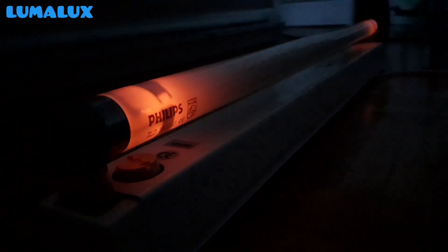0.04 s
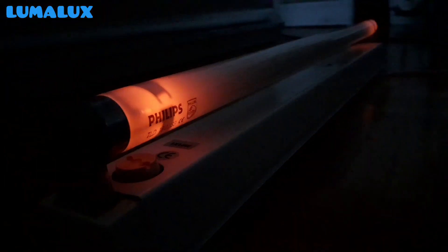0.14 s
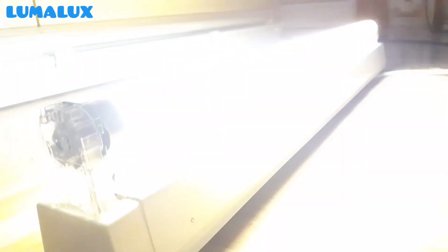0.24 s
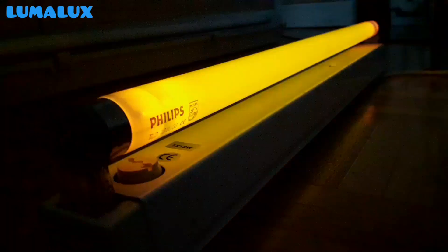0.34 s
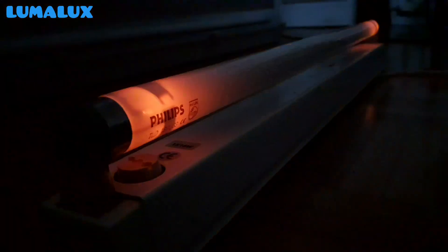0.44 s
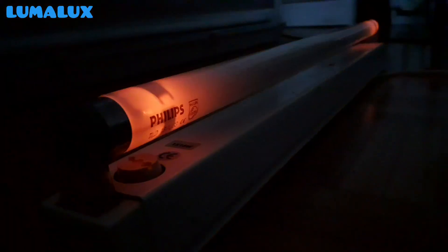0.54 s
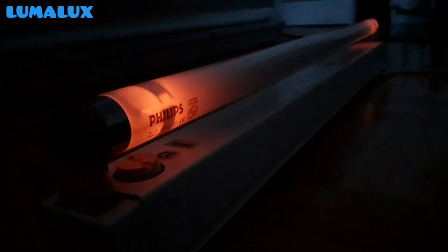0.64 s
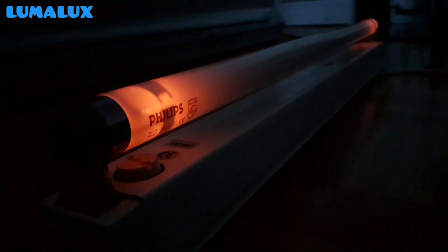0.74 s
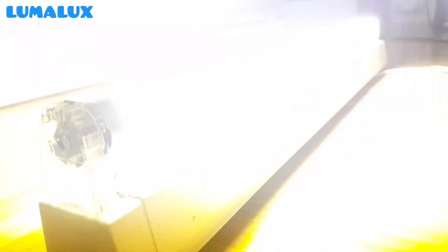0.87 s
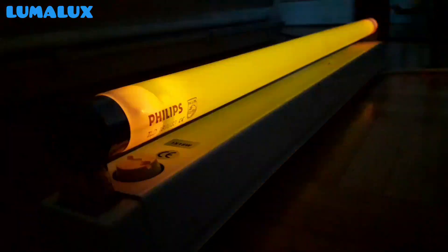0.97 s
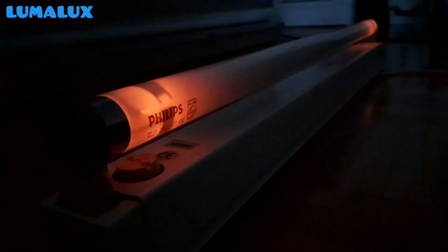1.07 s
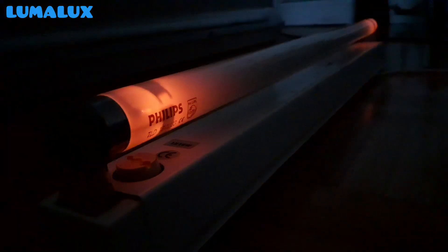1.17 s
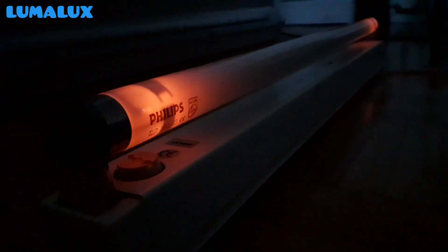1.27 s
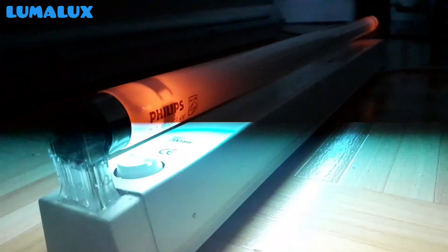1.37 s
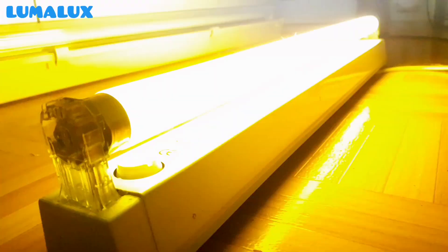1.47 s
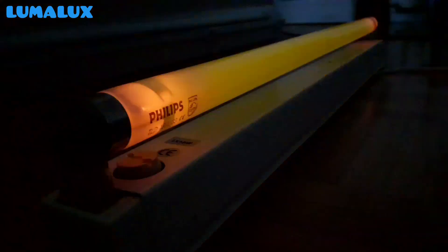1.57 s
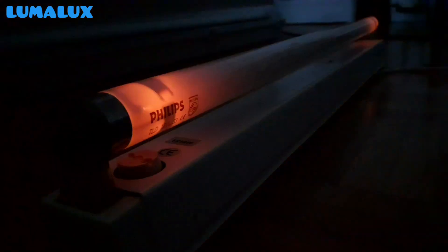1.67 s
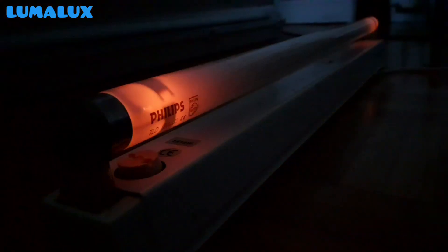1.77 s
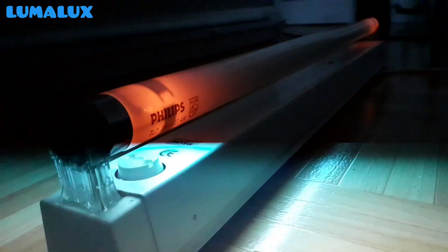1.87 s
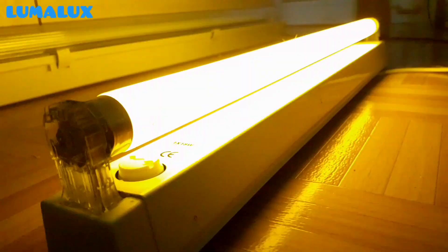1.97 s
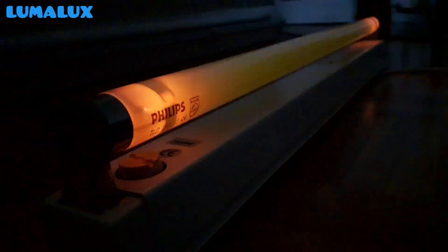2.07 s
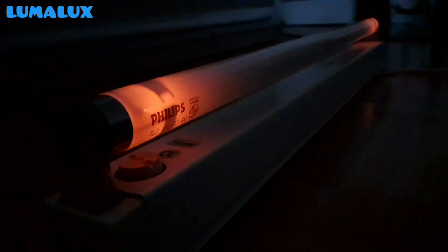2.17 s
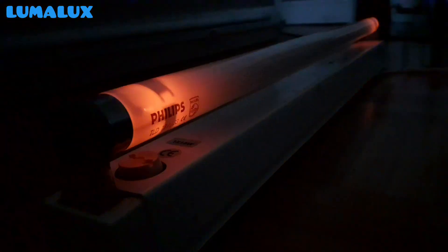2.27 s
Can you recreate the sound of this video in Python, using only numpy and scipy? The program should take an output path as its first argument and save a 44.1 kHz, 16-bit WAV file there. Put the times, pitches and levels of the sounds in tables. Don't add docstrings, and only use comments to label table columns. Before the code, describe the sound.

Metallic clacks of a fluorescent lamp starting burst four times over a steady low electrical hum

```python
import sys
import numpy as np
from scipy import signal
from scipy.fft import rfft, irfft, next_fast_len
from scipy.io import wavfile

SR = 44100
rng = np.random.default_rng(int(sys.argv[2]) if len(sys.argv) > 2 else 0)


def dump(signal):
    limited = np.clip(np.atleast_2d(signal).T, -1, 1)
    pcm = np.round(limited * 32767).astype(np.int16)
    wavfile.write(sys.argv[1], SR, pcm)


def level_to_linear(level):
    exponent = np.asarray(level, float) / 20
    return 10 ** exponent


N = 101430
T = np.arange(N) / SR
CUTOFF_HZ = 15800

# [t/s, plate level/dB, tray level/dB, crack level/dB, glass level/dB]
STRIKES = [(0.235, -35.5, -38.5, -51.5, -52), (0.244, -43, -47, -55, -68),
           (0.255, -25.5, -37.5, -38.5, -41), (0.274, -21.5, -42, -43, -42.5),
           (0.293, -32, -32, -39.5, -41), (0.876, -40.5, -39.5, -57, -58), (0.893, -33, -39, -44.5, -47),
           (0.914, -29.5, -37, -40.5, -47), (0.928, -71, -37, -71, -52), (1.435, -34.5, -36.5, -45.5, -49),
           (1.454, -33, -36.5, -44.5, -49.5), (1.475, -30.5, -60, -42, -47.5),
           (1.499, -47, -36, -65, -49.5), (1.935, -31.5, -35.5, -45.5, -51), (1.955, -35, -40.5, -49, -49),
           (1.975, -28, -33.5, -39.5, -42), (2.009, -66, -34.5, -61, -77)]
# [t/s, low plate level/dB, high plate level/dB, crack level/dB, bulb level/dB]
CONTACT_SNAPS = [
    (0.227, -42, -39, -54, -44.5),
    (0.325, -49, -50, -50.5, -54),
    (.867, -42, -41, -56.5, -50),
    (1.417, -58.5, -44.5, -60, -60),
    (1.917, -53.5, -46.5, -62, -65),
    (1.965, -80, -44.5, -60.5, -50),
]


def rms_one(x):
    return x / np.sqrt(np.mean(x ** 2) + 1e-20)


def at_hz(points, hz, column=1):
    points = np.array(points)
    return np.interp(np.log(hz), np.log(points[:, 0]), points[:, column])


def sides(left_db):
    return level_to_linear(np.array([[0.5], [-0.5]]) * left_db)


def cut(x, hz, kind, order=2):
    return signal.sosfilt(signal.butter(order, hz, kind, fs=SR, output="sos"), x)


def low_pass(x, hz):
    return signal.sosfilt(signal.ellip(12, 0.5, 85, hz, fs=SR, output="sos"), x)


def drift(rate_hz):
    hop = 40
    pole = np.exp(-2 * np.pi * rate_hz * hop / SR)
    noise = rng.standard_normal(N // hop + 2002)
    slow = signal.lfilter([1], [1, -2 * pole, pole ** 2], noise)[2000:]
    return np.interp(np.arange(N) / hop, np.arange(len(slow)), rms_one(slow))


def coloured(spectrum, low_hz, high_hz):
    # [f/Hz, coherence, left-right level/dB]
    diffuse = [(30, 0.09, -9), (125, 0.33, 10.5), (490, 0.079, -1), (1940, 0.043, 2.5), (3730, 0.022, 5.5),
               (10800, 0.0057, 0.5)]
    hz = np.maximum(np.fft.rfftfreq(N, 1 / SR), 1)
    mid, side = rfft(rng.standard_normal((2, N)))
    alike = np.sqrt(np.clip(at_hz(diffuse, hz), 0, 0.99))
    pair = np.sqrt(1 + alike) * mid + np.sqrt(1 - alike) * side * [[1], [-1]]
    band = 1 / (1 + (low_hz / hz) ** 12) / (1 + (hz / high_hz) ** 12)
    balance = sides(at_hz(diffuse, hz, column=2))
    return rms_one(irfft(pair * level_to_linear(at_hz(spectrum, hz)) * band * balance, N))


def clicks(s, gains):
    out = np.zeros(N, complex) + 1e-18
    out[(np.asarray(s) * SR).astype(int)] = gains
    return out


def body(modes, s, db, ear_rad=0.013):
    spread_db, spread_rad = 2.5, 0.72
    swell_s = 0.0012
    out = np.zeros((2, N))
    soft = np.exp(-1 / (swell_s * SR))
    for hz, mode_db, t60, left_db in modes:
        turn = np.exp(2j * np.pi * hz / SR)
        chance = rng.standard_normal((len(s), 2))
        gains = level_to_linear(db + mode_db + spread_db * chance[:, 0]) * np.exp(1j * spread_rad * chance[:, 1])
        decay = level_to_linear(-60 / (max(t60, 0.005) * SR))
        ringing = signal.lfilter([1], [1, -decay * turn], clicks(s, gains))
        ringing = signal.lfilter([1 - soft], [1, -soft * turn], ringing)
        ear_phase = np.exp(1j * rng.normal(ear_rad, 0.29) * np.array([[1], [-1]]))
        out += sides(left_db) * np.imag(ringing * ear_phase)
    return out


def crackle(spectrum, top_hz, s, db, t60, left_db):
    tail = signal.lfilter([1], [1, -level_to_linear(-60 / (t60 * SR))], clicks(s, level_to_linear(db)).real)
    flash_t60 = 0.0009
    flash = signal.lfilter([1], [1, -level_to_linear(-60 / (flash_t60 * SR))], clicks(s, level_to_linear(db - 13.5)).real)
    mid, side = rng.standard_normal((2, N)) * (tail + flash)
    hz = np.maximum(np.fft.rfftfreq(N, 1 / SR), 1)
    colour = level_to_linear(at_hz(spectrum, hz)) / (1 + (spectrum[0][0] / hz) ** 6) / (1 + (hz / top_hz) ** 12)
    colour /= np.sqrt(np.mean(colour ** 2))
    return irfft(rfft(mid + 0.97 * side * [[1], [-1]]) * colour, N) * sides(left_db)


def double_hit(s, db, hz, t60, again_s, again_db, left_db):
    pole = level_to_linear(-60 / (max(t60, 0.003) * SR)) * np.exp(2j * np.pi * hz / SR)
    force = clicks(s, level_to_linear(db)) + clicks(s + again_s, level_to_linear(db + again_db))
    ringing = signal.lfilter([np.e * (1 - abs(pole))], [1, -2 * pole, pole ** 2], force)
    return sides(left_db) * np.imag(ringing)


def microphone_hiss():
    # [f/Hz, spectral level/dB per Hz]
    hiss_spectrum = [(2300, 0.5), (3100, -2), (3900, 1), (5500, -6.5), (9000, -13), (10700, -3), (12000, 3),
                     (15700, 2.5)]
    return level_to_linear(-69) * low_pass(coloured(hiss_spectrum, 2300, 22000), CUTOFF_HZ + 50)


def room_air():
    # [f/Hz, spectral level/dB per Hz]
    air_spectrum = [(25, -18), (60, 0), (200, 2), (450, 3), (800, 0), (1050, -5.5), (1450, -12.5),
                    (1950, -5.5)]
    return level_to_linear(-64.5 + 1.0 * drift(0.57)) * coloured(air_spectrum, 33, 2180)


def thuds():
    # [t/s, level/dB, f/Hz]
    far_blows = [
        (0.128, -62, 160),
        (0.322, -64, 72),
        (1.486, -62, 100),
        (1.702, -65.5, 101),
        (2.018, -58, 69),
    ]
    t60 = 0.16
    return sum(body([(hz, 0.0, t60, 6.0)], [s], db) for s, db, hz in far_blows)


def room(x):
    t60, wall_cut_hz = 0.29, 37000
    size = next_fast_len(N + SR)
    w = 2 * np.pi * np.fft.rfftfreq(size)
    absorption = 1 / (1 + 1j * w * SR / (2 * np.pi * wall_cut_hz)) ** 0.033
    out = np.zeros((2, len(w)), complex)
    for k, lag in enumerate(rng.uniform(0.0072, 0.03, 16) * SR):
        loop = level_to_linear(-60 * lag / SR / t60) * absorption * np.exp(-1j * w * lag)
        out[k % 2] += loop / (1 - loop) * (-1) ** (k // 2)
    return irfft(out * rfft(x, size), size)[:, :N] / 2


def preheat_current():
    # [opens t/s, closes t/s]
    open_spells = [
        (0.23, 0.373),
        (0.87, 1.011),
        (1.42, 1.53),
        (1.92, 2.076),
    ]
    fade_s, swell_s, left_over_db = 0.077, 0.032, -21
    current = np.ones(N)
    for opens, closes in open_spells:
        fade = np.exp(-np.clip(T - opens, 0, closes - opens) / fade_s)
        back = np.exp(-np.clip(T - closes, 0, None) / swell_s)
        current *= 1 - (1 - level_to_linear(left_over_db)) * (1 - fade) * back
    return current


def ballast():
    # [multiple of the buzz, level/dB, left-right level/dB, phase/rad, right lag/rad]
    harmonics = [(2, -80, -5, -0.5, 0.12), (3, -60.5, 6, -4.5, 0.71), (4, -51.5, 4.5, -0.62, 0.012),
                 (4.5, -80, 21.5, 2.2, 0.067), (5, -65.5, 7, 1, 1.75), (6, -76.5, 11, 8, 0.043),
                 (7, -83.5, -1.5, 9.5, 0.36), (10, -75.5, 3, 1.8, 1.5), (11, -86, 4, 1.5, 0.27)]
    buzz_hz, wobble_db, rattle_db = 99.947, 0.28, -72.5
    current = preheat_current()
    turn = 2 * np.pi * buzz_hz * T
    hum = np.zeros((2, N))
    for k, db, left_db, rad, lag in harmonics:
        follows = 0.29 if k < 3.5 else 1
        gain = np.sqrt(2) * level_to_linear(db + wobble_db * drift(5.2)) * current ** follows
        phase = round(2 * k) / 2 * turn + rad - np.array([[0], [lag]])
        hum += gain * sides(left_db) * np.cos(phase)
    rattle = coloured([(500, 10.5), (1000, 2.0), (1400, -7.5), (2000, -4.5)], 730, 1830)
    rattle = rattle * (1 + 0.84 * np.cos(turn))
    return hum + current * level_to_linear(rattle_db) * rattle


def settling():
    # [t/s, loss level/dB]
    losses = [
        (0.34, -1),
        (0.958, -7.5),
        (1.54, -2.5),
        (2.014, -10.5),
    ]
    settle_s, settled_for_s = 0.01, 0.3
    loss_db = np.zeros(N)
    for s, db in losses:
        loss_db += db * np.clip((T - s) / settle_s, 0, 1) * (T < s + settled_for_s)
    return level_to_linear(loss_db)


def blows():
    # [t/s, rap level/dB, thump level/dB, thump delay/s, bong level/dB]
    hard_strikes = [(0.2565, -32.5, -37.5, 0.0023, -32.5), (0.2743, -26.5, -44, 0.0036, -33),
                    (0.2941, -33.5, -42, 0.0037, -43), (0.8951, -39, -37, 0.0037, -46),
                    (0.9142, -36, -33.5, .002, -38), (1.4346, -43.5, -37, 0.0034, -59),
                    (1.4551, -46, -35.5, .0035, -49), (1.475, -34, -41, 0.00376, -49),
                    (1.9364, -37.5, -42, 0.0032, -59), (1.9556, -40, -33, .0035, -58),
                    (1.975, -36.5, -34.5, 0.0022, -42)]
    s, rap_db, thump_db, late_s, bong_db = np.transpose(hard_strikes)
    rap = double_hit(s, rap_db, hz=2000, t60=0.0055, again_s=0.004, again_db=-3.5, left_db=5.5)
    thump = double_hit(s + late_s, thump_db, hz=470, t60=0.012, again_s=0.0055, again_db=-2.5, left_db=3.5)
    bong = double_hit(s + late_s / 2, bong_db, hz=1007, t60=0.0251, again_s=0.007, again_db=-5.5, left_db=2)
    return rap + thump + bong


def steel():
    # [f/Hz, level/dB, t60/s, left-right level/dB]
    tray_modes = [(209.8, -16, 0.1, 5.5), (253.5, -9, 0.075, 1.5), (303.8, -9.5, 0.22, 7.5),
                  (396, -10.5, 0.24, 3), (438.8, -4, 0.4, 5), (516, -14, 0.09, 1), (582.3, -5, 0.16, 8.5),
                  (617.4, -9.5, 0.37, 1.5), (695.5, -10.5, 0.19, 10)]
    # [f/Hz, level under a strike/dB, t60/s, left-right level/dB, level under a snap/dB]
    plate_modes = np.array([(790, 0, 0.047, 10.5, 1.5), (863.6, -3.5, 0.15, 0, 4.5), (1027, -3, 0.13, 3, 6),
                            (1076, -5.5, 0.087, 3, -23), (1292, -14.5, 0.21, 3, -30),
                            (1521, -8, 0.15, 9, -9.5), (1637, -10, 0.11, 11.5, 0),
                            (1815, -2.5, 0.062, 3, 3.5), (1848, -10.5, 0.076, -10.5, -29),
                            (1882, -6, 0.09, 8, -1), (2110, -24, 0.17, 14, -7.5),
                            (2328, -7.5, 0.11, 8.5, -5), (2366, -2, 0.077, 2, -40),
                            (2872, -17.5, 0.15, 17.5, -32)])
    # [f/Hz, level/dB, t60/s, left-right level/dB]
    knock_modes = [(1010, -2.5, 0.0066, 14), (1760, -8, 0.018, 9), (2260, -3, 0.0047, 5)]
    low_ear_rad, high_ear_rad = 0.53, 0.54
    shove_late_s, shove_hz = 0.00452, 707
    s, plate_db, tray_db, _, _ = np.transpose(STRIKES)
    snap_s, low_db, high_db, _, _ = np.transpose(CONTACT_SNAPS)
    plate_db = plate_db - 12
    struck, pinged = plate_modes[:, :4], plate_modes[:, [0, 4, 2, 3]]
    out = cut(body(tray_modes, s + shove_late_s, tray_db - 2.5), shove_hz, "low")
    out += body(struck[:5], s, plate_db, low_ear_rad)
    out += body(struck[5:], s, plate_db, high_ear_rad)
    out += body(pinged[:5], snap_s, low_db, low_ear_rad)
    out += body(pinged[5:], snap_s, high_db, high_ear_rad)
    out += body(knock_modes, s, plate_db, high_ear_rad)
    return cut(out * settling() + blows(), 3070, "low")


def glass():
    # [f/Hz, level/dB, t60/s, left-right level/dB]
    bulb_modes = [(12700, -24, .06, 10), (13200, -8, .13, 13), (13250, -15, .07, 13), (14100, -7, .02, 13),
                  (15300, -17, .02, 13)]
    tink_modes = [(9100, -3, .05, 3), (10985, -2, .3, 5), (11010, -5, .3, 5)]
    snap_s, _, _, _, bulb_db = np.transpose(CONTACT_SNAPS)
    tink_s, tink_db = 1.484, -65
    out = body(bulb_modes, snap_s, bulb_db + 5.5) + body(tink_modes, [tink_s], tink_db)
    return cut(out, 5300, "high", order=4)


def clatter():
    # [f/Hz, spectral level/dB per Hz]
    steel_spectrum = [(1500, 6.5), (2400, 3.5), (3100, -12), (3900, 1.5), (4500, -2.5), (5400, -8.5),
                      (6400, -4), (8000, -3.5)]
    glass_spectrum = [(9500, -11.5), (12300, -6.5), (13500, -6), (14100, 7), (14700, -14), (15400, 2),
                      (15800, -3)]
    s, _, _, crack_db, glass_db = np.transpose(STRIKES)
    snap_s, _, _, tick_db, _ = np.transpose(CONTACT_SNAPS)
    both_s = np.r_[s, snap_s]
    steel_db = np.r_[crack_db, tick_db] - 4
    strike_spark_db = 1.63 * (glass_db + 46.5) - 52.5
    spark_db = np.r_[strike_spark_db, tick_db + 3] + 0.5
    out = crackle(steel_spectrum, 8000, both_s, steel_db, t60=0.079, left_db=8)
    return out + crackle(glass_spectrum, 20000, both_s, spark_db, t60=0.038, left_db=12.5)


def fitting():
    return cut(steel() + glass() + clatter(), 166, "high", order=4)


def scene():
    lamp = fitting() * sides(-1)
    dulled = cut(lamp, 12800, "low", order=1)
    echo = level_to_linear(-11) * sides(-2.5) * room(dulled)
    return room_air() + microphone_hiss() + thuds() + ballast() + lamp + echo


def roll_off(x):
    return signal.sosfilt(signal.butter(12, 16460, fs=SR, output="sos"), x)


def record(dry):
    leak = level_to_linear(-31.5) * dry
    mix = low_pass(low_pass(dry, CUTOFF_HZ) + leak, 16450)
    return roll_off(mix)


dry = scene()
out = record(dry)
dump(out)
```